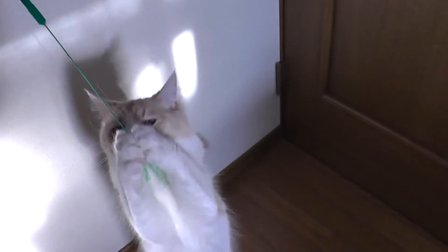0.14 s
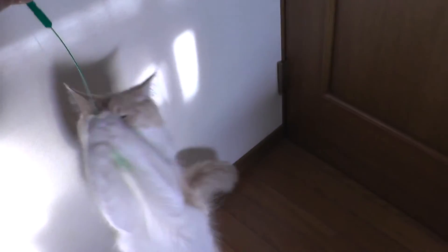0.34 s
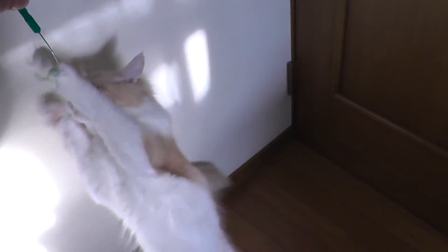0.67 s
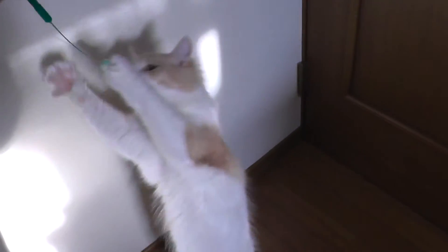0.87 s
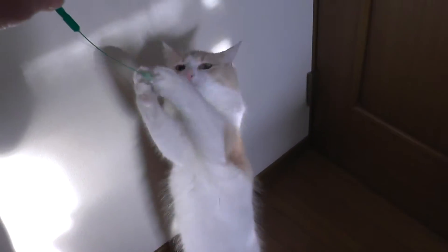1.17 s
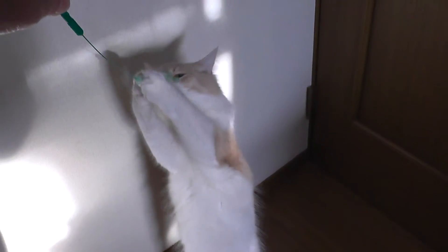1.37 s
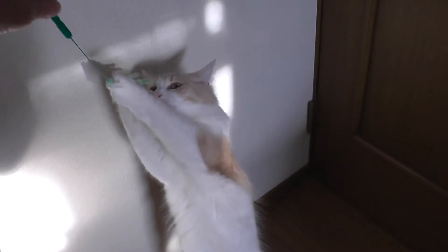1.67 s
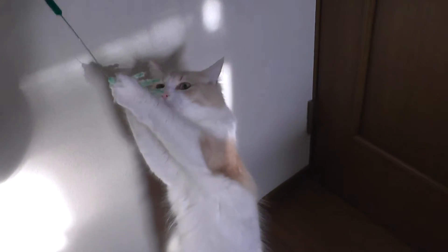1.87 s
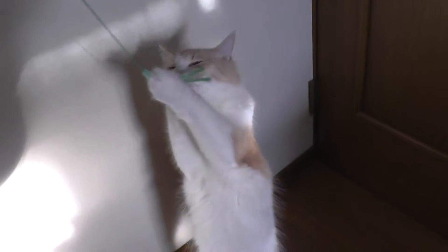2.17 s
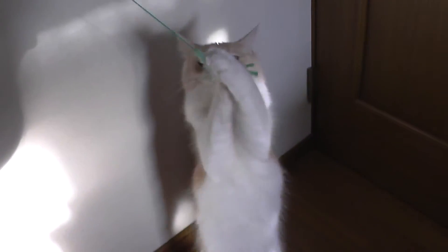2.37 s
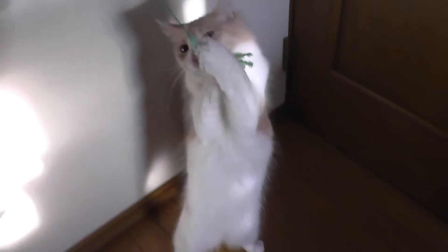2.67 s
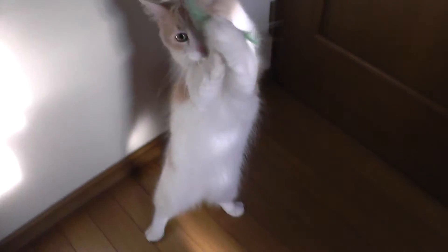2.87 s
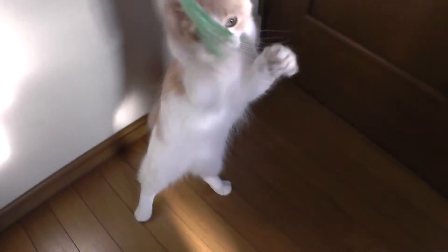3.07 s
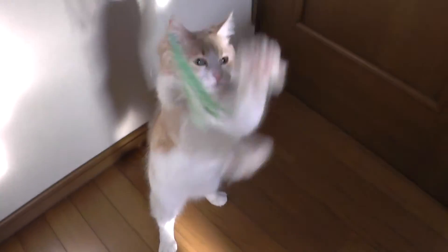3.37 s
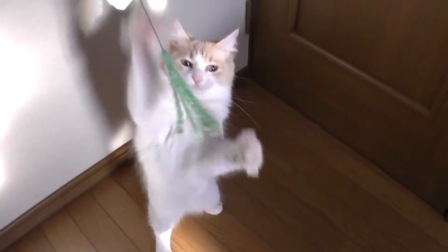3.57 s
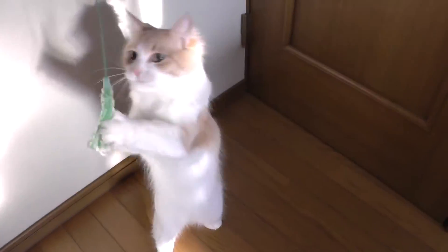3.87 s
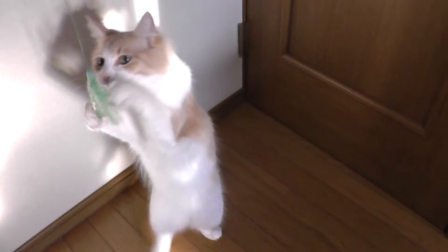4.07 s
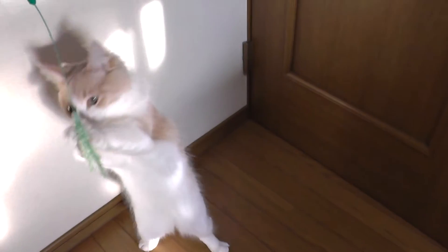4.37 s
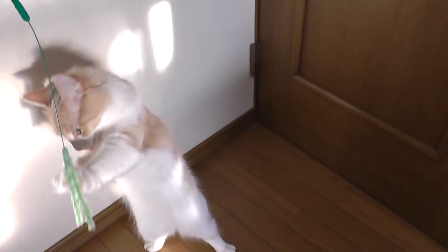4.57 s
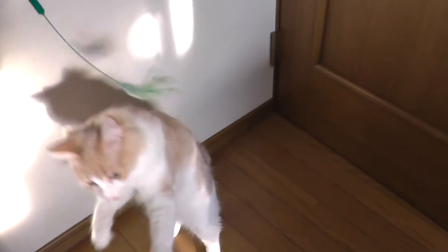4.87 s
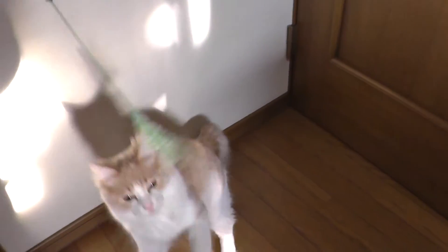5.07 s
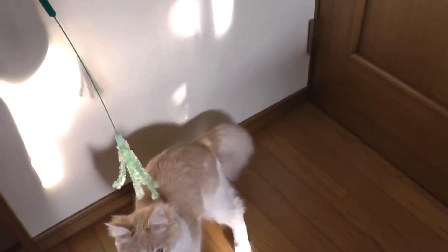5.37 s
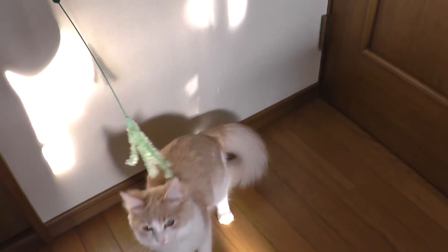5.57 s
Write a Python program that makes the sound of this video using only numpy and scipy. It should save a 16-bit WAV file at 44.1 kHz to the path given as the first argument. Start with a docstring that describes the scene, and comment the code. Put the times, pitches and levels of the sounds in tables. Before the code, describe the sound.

A cat plays with a strand toy in a small hallway, heard on a handheld stereo microphone with low wavering room tone and constant soft hiss. A dry swish starts at once, with a woody paw thud at 0.06 s. Faint, fast motor ticking over a thin whine runs until about 1 s, barely pausing near 0.75. Small snaps come near 0.5, a softer thud at 0.8, then gentle rustling, with a tiny hollow pop and snaps around 1.8. Near 2.35 a clearer pop meets a very faint rising squeak, then a thud at 2.44. A heavier thump lands at 3.2; snaps, a swish and a low knock cluster at 3.6-3.8. Motor ticking returns at 4.1-4.85, with a strong double thud at 4.24 and a sharp snap at 4.8. Thuds and bright clicks crowd 5.1-5.25, a falling pad rub follows at 5.5, and a weak thump and rustle at 5.7.

```python
"""A cat on its hind legs swipes at a grass toy in a small hallway. A swish of friction noise opens it; a camera's
focus motor ticks as a ringing housing over a thin whine, early on and again near 4 s. Paws thud on wooden boards,
which ring as many fading notes. Strands and claws snap as tiny noise bursts; two short hollow pops and, last, a
low knock are pairs of fading notes; one faint squeak slides near 2.3 s. Thuds and snaps crowd together from 3.6 s;
near 5.5 s a pad rubs the boards as falling noise. Room tone and microphone hiss, both shaped noise, never stop."""
import sys
import numpy as np
from scipy import signal
from scipy.fft import rfft, irfft, next_fast_len
from scipy.io import wavfile
from scipy.ndimage import map_coordinates

SR = 44100
rng = np.random.default_rng(int(sys.argv[2]) if len(sys.argv) > 2 else 0)


def digitize_waveform(pressure):
    """Quantize a signal to 16-bit integers and store it at the path in sys.argv[1].

    Rows of a 2-D input are taken as channels; values are limited to [-1, 1].
    """
    field = np.atleast_2d(pressure).T
    bounded = np.clip(field, -1, 1)
    quanta = np.round(bounded * 32767).astype(np.int16)
    wavfile.write(sys.argv[1], SR, quanta)


N = 252693  # length in samples

# paw landings: (t/s, boom level at 110 Hz/dB, body level at 160 Hz/dB, knock level at 310 Hz/dB,
# slap level at 600 Hz/dB, push level/dB, push f/Hz)
PAW_LANDINGS = [(0.058, -32.5, -32, -31, -36, -39, 151), (0.286, -47.5, -59.5, -78, -68, -66, 132),
                (0.832, -37, -39, -55.5, -54.5, -58, 146), (2.4428, -37.5, -38.5, -42, -44, -33.5, 184),
                (3.2296, -26.5, -38.5, -31.5, -37, -36, 135), (3.608, -72, -66, -62, -52, -60, 300),
                (3.648, -72, -59, -65, -47, -49, 234), (3.784, -76, -73, -57.5, -55, -65, 299),
                (4.147, -73, -54, -60.5, -45.5, -64, 159), (4.238, -28.5, -62, -33, -33, -41, 470),
                (4.257, -33.5, -38.5, -43.5, -44.5, -44, 136), (4.864, -46.5, -40.5, -49, -58, -47, 155),
                (4.885, -48, -52, -51, -50.5, -47, 328), (5.119, -63, -63, -74, -40, -64, 466),
                (5.170, -43, -40, -48, -38.5, -47, 154), (5.216, -39, -56, -42, -53, -56, 234),
                (5.237, -41, -60, -48.5, -42.5, -52, 306), (5.705, -62, -57, -63, -51, -62, 200)]
# where the spot on the boards sets the level: (f/Hz)
SPOT_HZ = [110, 160, 225, 310, 600]
# notes of the floorboards, before small random shifts: (f/Hz, level/dB, t60 before the ring factor/s, build-up/s)
BOARD_MODES = [(115, 0.5, 0.18, 0.0037), (159.7, 4, 0.13, 0.0035), (235.7, 2.5, 0.15, 0.0026),
               (236.1, -0.5, 0.16, 0.002), (285.4, 0.5, 0.16, 0.0058), (307.5, -3, 0.18, 0.01),
               (332.2, -6, 0.24, 0.012), (347, 0.5, 0.21, 0.017), (393, 0, 0.077, 0.0028),
               (422.6, -5.5, 0.21, 0.015), (462.7, -8.5, 0.2, 0.0073), (525, -7.5, 0.12, 0.0017),
               (608, -10.5, 0.088, 0.0081)]
DRUM_DB = -2.5  # level at 225 Hz over the mean of body and knock
RING_SOFT, SOFT_HZ, RING_SHORTENS = 1.296, 147, 0.33  # ring factor at a 147 Hz push; quicker pushes ring shorter


def board_ring(t, spot, ringing):
    """The boards ring as many fading notes; the spot sets how strongly each one speaks."""
    ring = np.zeros(len(t))
    for k, (hz, mode_db, t60, rise) in enumerate(BOARD_MODES):
        level_db = mode_db + along(spot, hz) + rng.normal(0, 1.5)
        fade = amp(level_db - 60 * t / (t60 * ringing))
        # each note's pitch shifts slightly at random on every landing
        note = np.sin(2 * np.pi * hz * rng.normal(1, 0.013) * t)
        # the weight settles, so each note swells before it fades
        swell = 1 - np.exp(-t / rise)
        ring += (-1) ** k * fade * note * swell
    return ring


def paws():
    """A soft pad pushes the boards, slaps them and leaves them ringing, answered by the hall."""
    out, t = np.zeros((2, N)), np.arange(SR // 3) / SR
    for s, boom_db, body_db, knock_db, slap_db, push_db, push_hz in PAW_LANDINGS:
        drum_db = (body_db + knock_db) / 2 + DRUM_DB
        spot = list(zip(SPOT_HZ, [boom_db, body_db, drum_db, knock_db, slap_db]))
        ringing = RING_SOFT * (SOFT_HZ / push_hz) ** RING_SHORTENS
        ring = board_ring(t, spot, ringing)
        push = np.sin(2 * np.pi * push_hz * t) * np.exp(-((push_hz * t - 1.1) / .75) ** 2)
        # above the modes the boards answer with a dense noise
        dense = unit(filtered(rng.standard_normal(len(t)), lambda f: resonance(f, 647, 470) ** 2))
        slap = dense * amp(slap_db - 11 - 60 * t / (0.15 * ringing))
        # weaken everything below about 65 Hz
        thud = filtered(ring - amp(push_db) * push + slap, lambda f: (1j * f / (65 + 1j * f)) ** 2)
        add(out, s, thud[None])
        add(out, s, amp(-9.5) * hall(thud[:SR // 10]))
    return out


# claws tick and pads scuff: (t/s, low band level/dB, middle band level over low/dB, left over right level/dB)
PAW_SCUFFS = [(0.0596, -67.5, -1.5, -2), (2.4438, -79, 2, -1.5), (3.2308, -67, -2, 4),
              (3.609, -77.5, -24, 1), (3.7824, -74.5, -16, -0.5), (4.1474, -68, -23, -0.5),
              (4.239, -64.5, 3.5, 1.5), (5.1212, -63.5, -4, 2), (5.1721, -73.5, 0, -1),
              (5.2166, -57.5, 3, 3), (5.6802, -68.5, -17, -0.5)]
SCUFF_HIGH_DB = -11  # high band over the middle


def scuff_bands(low_db, middle_db):
    """High, middle and low band level of a scuff."""
    return np.array([low_db + middle_db + SCUFF_HIGH_DB, low_db + middle_db, low_db])


# snaps of the toy's strands: (t/s, high band level/dB, middle band level over high/dB, left over right level/dB)
STRAND_SNAPS = [(0.4544, -56, -16, 6), (0.4977, -53, -22, 0.5), (1.8345, -60, -3, 0.5),
                (1.8638, -49, -4, -1), (1.882, -54, 6, -7), (2.372, -60, -15, 0), (2.9145, -54, 2.5, 0),
                (3.6497, -55, -3, -1), (3.684, -41.5, -2.5, 0), (3.696, -60, 12, -1),
                (3.7304, -60, -11, -0.5), (4.8111, -41, -3.5, 2), (5.2198, -44, 11, 3),
                (5.2304, -39.5, -3, 0.5), (5.4895, -64, -3, -2), (5.5907, -64, -16, 1.5)]
# high, middle and low band, where strands, fur and pads sound: (f/Hz, width/Hz)
FRICTION_BANDS = [(9960, 4700), (5620, 3200), (1920, 2860)]
# claw tick over its scuff in the high, middle and low band: (level/dB)
CLAW_OVER_SCUFF_DB = [21.5, 17.5, 19.5]
SNAP_LOW_DB, SNAP_T60 = -1.5, 0.01  # low band over the high (dB); fade of the noise before the bands (s)


def snaps():
    """Each snap of a strand or tick of a claw is a brief burst of noise in three bands, answered by the hall."""
    out, t = np.zeros((2, N)), np.arange(SR // 12) / SR
    bursts = []
    for s, db, middle_db, pan_db in STRAND_SNAPS:
        bursts.append((s, [db, db + middle_db, db + SNAP_LOW_DB], pan_db))
    for s, db, middle_db, pan_db in PAW_SCUFFS:
        bursts.append((s, scuff_bands(db, middle_db) + CLAW_OVER_SCUFF_DB, pan_db))
    for s, band_db, pan_db in bursts:
        noise = rng.standard_normal(len(t)) * amp(-60 * t / SNAP_T60) * (1 - np.exp(-t / .0005))
        noise[20] += 2.5  # the sharp edge of the break
        parts = [filtered(noise, lambda f: resonance(f, hz, w) ** 2) for hz, w in FRICTION_BANDS]
        # each band is set to its own peak level
        snap = sum(amp(db) * part / np.abs(part).max() for db, part in zip(band_db, parts))
        add(out, s, snap * amp([[pan_db / 2], [-pan_db / 2]]))
        add(out, s, amp(-25.0) * hall(snap))
    return out


# swishes of toy and fur: (t/s, rise/s, hold/s, high band level/dB)
TOY_SWISHES = [(0, 0.0022, 0.026, -66), (0.44, .012, 0.061, -72.5), (.744, .045, .08, -77.5),
               (1.067, .079, .15, -85), (1.498, .017, .079, -82.5), (1.831, .004, 0.031, -70),
               (2.345, .009, 0.038, -83), (2.91, .002, .007, -79), (2.982, .058, .031, -74.5),
               (3.1, .02, .04, -76), (3.349, 0.023, 0.015, -76.5), (3.652, .0044, 0.033, -63),
               (3.726, .003, .013, -73.5), (4.043, 0.053, 0.022, -75.5), (4.811, .001, 0.011, -65),
               (5.31, .1, .086, -72.5), (5.688, .025, .05, -70.5)]
SWISH_MIDDLE_DB, SWISH_LOW_DB = -2, -6.5  # over the high band
SWISH_T60, USUAL_DB, LINGER = 0.18, -70.5, .6  # fade (s) at the usual level; gentler swishes linger
SCUFF_RISE_S, SCUFF_HOLD_S, SCUFF_T60 = 0.00086, 0.011, 0.29


def rustle():
    """Grainy strokes of friction: thin strands highest, fur in the middle, pads scuffing the boards lowest."""
    t, powers = np.arange(SR) / SR, np.zeros((len(FRICTION_BANDS), N))
    strokes = []
    for s, rise, hold, db in TOY_SWISHES:
        t60 = SWISH_T60 * amp(LINGER * (USUAL_DB - db))
        strokes.append((s, rise, hold, t60, [db, db + SWISH_MIDDLE_DB, db + SWISH_LOW_DB]))
    for s, db, middle_db, _ in PAW_SCUFFS:
        strokes.append((s, SCUFF_RISE_S, SCUFF_HOLD_S, SCUFF_T60, scuff_bands(db, middle_db)))
    for s, rise, hold, t60, band_db in strokes:
        fade = amp(-60 * np.clip(t - rise - hold, 0, None) / t60)
        stroke = np.clip(t / rise, 0, 1) * fade
        add(powers, s, (amp(band_db)[:, None] * stroke) ** 2)  # overlapping strokes add as power
    out = np.zeros((2, N))
    # left-right likeness (0-1) and grain (dB) of each band
    for power, (hz, w), like, grain_db in zip(powers, FRICTION_BANDS, [.3, .7, .75], [2.2, 1.6, 1.8]):
        noise = rush(lambda f: abs(resonance(f, hz, w)) ** 2, [(hz, like)], grain_db)
        out += np.sqrt(power) * noise
    return out


# short hollow pops and, last, a low knock:
# (t/s, low note level/dB, low f/Hz, high f/Hz, high note level over low/dB)
POPS_AND_KNOCK = [(1.7894, -53, 805, 943, 12), (2.333, -39.5, 633, 1103, -1), (3.6816, -42.5, 195, 537, 6)]


def pops_and_knock():
    """Two fast-dying notes each, answered by the hall."""
    out, t = np.zeros((2, N)), np.arange(SR // 20) / SR
    for s, db, low_hz, high_hz, high_db in POPS_AND_KNOCK:
        notes = np.sin(2 * np.pi * low_hz * t) + amp(high_db) * np.sin(2 * np.pi * high_hz * t)
        pair = notes * amp(db - 60 * t / 0.026) * (1 - np.exp(-t / 0.00063))
        add(out, s, pair[None])
        add(out, s, amp(-11.5) * hall(pair))
    return out


# one rising squeak: (start t/s, length/s, first f/Hz, last f/Hz)
SQUEAK_GLIDE = (2.35, .045, 595, 640)
SQUEAK_DB = -59.5


def squeak():
    """A faint, short sliding tone with its octave."""
    phase, swell = glide(*SQUEAK_GLIDE)
    return amp(SQUEAK_DB) * swell * (np.sin(phase) + amp(-7) * np.sin(2 * phase))


# a pad dragged on the boards: (start t/s, length/s, first f/Hz, last f/Hz)
RUB_GLIDE = (5.47, .095, 1380, 1040)
RUB_DB, RUB_HISS_DB = -60.5, -68


def rub():
    """The dragged pad makes a narrow, falling band of noise inside a broader hiss."""
    phase, swell = glide(*RUB_GLIDE)
    hiss = unit(filtered(rng.standard_normal(N), lambda f: resonance(f, *FRICTION_BANDS[-1]) ** 2))
    # a quick random level roughens the tone into a narrow band
    tone = wobble(220) * np.sin(phase)
    return amp(RUB_DB) * swell * tone + amp(RUB_HISS_DB) * np.sqrt(swell) * hiss


# focus motor runs; levels before the left-right split:
# (first tick t/s, end t/s, strong tick level/dB, whine level/dB)
MOTOR_RUNS = [(.0297, .74, -61, -76), (.7676, 1.01, -59.5, -76), (4.0671, 4.44, -61.5, -81),
              (4.5342, 4.85, -62, -81)]
# the housing rings at each tick, with small random shifts: (f/Hz, level/dB, t60/s)
HOUSING_MODES = [(1350, -2, .008), (1750, -1, .007), (2650, -5, .008), (3300, -10, .005),
                 (3800, -1.5, .009), (5500, -9, .005), (6800, -10, .005)]
TICK_RATE = 59.94  # ticks a second
WEAK_DB = -8  # every second tick
CLICK_DB, CLICK_T60 = 1, .006  # dry broad click in each tick; its fade (s)


def focus_motor():
    """Steady ticks, strong and weak in turn, ring the housing over a thin whine."""
    out, whine, t = np.zeros(N), np.zeros(N), np.arange(SR // 50) / SR
    scatter_db, detune, rise = 1.3, .012, .0013
    hz, mode_db, t60 = np.transpose(HOUSING_MODES)[:, :, None]
    # each mode swells for a moment, then dies
    swell = np.where(t < rise, t / rise, amp(-60 * (t - rise) / t60))
    for start, end, strong_db, whine_db in MOTOR_RUNS:
        for k, s in enumerate(np.arange(start, end, 1 / TICK_RATE)):
            size, pitch = rng.standard_normal((2, len(hz), 1))
            notes = np.sin(2 * np.pi * hz * (1 + detune * pitch) * t)
            modes = amp(mode_db + scatter_db * size) * swell * notes
            noise = filtered(rng.standard_normal(len(t)), lambda f: resonance(f, 2600, 3500))
            click = amp(CLICK_DB - 60 * t / CLICK_T60) * noise
            add(out, s, amp(strong_db + WEAK_DB * (k % 2)) * (modes.sum(0) + click))
        whine[round(start * SR):round(end * SR)] = amp(whine_db)
    out += whine * unit(filtered(rng.standard_normal(N), lambda f: resonance(f, 1296, 50)))
    return out * amp([[2], [-2]])  # the motor sits nearer the left port


# slow swells of the low room tone: (t/s, level/dB)
ROOM_LEVEL = [(0.0, -60.5), (0.35, -64), (1.42, -65.5), (1.68, -60), (2.09, -65.5), (2.51, -63.5),
              (2.84, -64.5), (3.62, -65.5), (3.8, -61), (3.96, -63), (4.72, -62), (5.73, -63.5)]
# colour of the room tone: (f/Hz, relative level per Hz/dB)
ROOM_COLOUR = [(15, -51), (25, -14), (86, -4), (186, -10), (232, -1.5), (266, -10.5), (300, -2),
               (327, -7.5), (422, -8), (484, -10.5), (897, -15), (1500, -22.5), (1950, -57), (3300, -120)]
# how alike left and right are in the room tone: (f/Hz, likeness up to 1)
ROOM_LIKENESS = [(30, 1), (80, 0.97), (250, 0.92), (640, 0.75), (1400, 0.84)]
# colour of the microphone hiss: (f/Hz, relative level per Hz/dB)
HISS_COLOUR = [(590, -24.5), (1000, -1), (1140, -16), (1480, -15.5), (1690, -0.5), (2080, -11.5),
               (4360, -17.5), (5830, -12.5), (7790, -16.5), (9380, -16), (16000, -18)]
# how alike left and right are in the hiss: (f/Hz, likeness up to 1)
HISS_LIKENESS = [(1400, 0.86), (3100, 1), (4500, 0.94), (6800, 0.13), (15000, 0.066)]
WAVER_DB = 1.5  # quick wavering of the room tone


def background():
    """Low room tone that swells slowly and wavers quickly, and steady microphone hiss: both are shaped noise."""
    room_db, = curves(ROOM_LEVEL)
    room = rush(lambda f: amp(along(ROOM_COLOUR, f)), ROOM_LIKENESS)
    hiss = rush(lambda f: amp(along(HISS_COLOUR, f)), HISS_LIKENESS)
    return amp(room_db + WAVER_DB * wobble(12)) * room + amp(-71.5) * hiss


# how long the hallway echoes: (f/Hz, t60/s)
HALL_FADE = [(150, 0.1), (1000, 0.5), (5500, 0.1), (12000, 0.81)]


def hall(x):
    """A fresh diffuse tail on a short sound; the two sides differ only above the bass."""
    hz, t, z = signal.stft(rng.standard_normal((2, SR // 3)), SR, nperseg=256)
    z = z * amp(-60 * t / along(HALL_FADE, hz)[:, None])
    z[1] *= (hz / (hz + 500))[:, None]  # little side signal in the bass
    mid, side = signal.istft(z, SR, nperseg=256)[1]
    tail = np.array([mid + side, mid - side]) / np.linalg.norm(mid)
    late = np.pad(x, (130, 0))  # the tail starts 130 samples (3 ms) late
    return signal.fftconvolve(late[None], tail, axes=1)


def amp(db):
    """dB to gain."""
    return 10 ** (np.asarray(db) / 20)


def unit(x):
    """x at rms 1."""
    return x / np.sqrt(np.mean(x ** 2) + 1e-20)


def along(points, hz):
    """Read a curve of (f/Hz, value) points on a log frequency axis."""
    f, v = np.transpose(points)
    return np.interp(np.log(hz + 1), np.log(f + 1), v)


def curves(rows):
    """One value per sample for each column after the time."""
    s, *cols = np.transpose(rows)
    return [np.interp(np.arange(N) / SR, s, c) for c in cols]


def wobble(rate):
    """A smooth random curve through rate random points a second."""
    knots = rng.standard_normal(int(N * rate / SR) + 4)
    return map_coordinates(knots, [np.arange(N) * rate / SR])


def filtered(x, response):
    """Shape x by a complex response of frequency."""
    m = next_fast_len(x.shape[-1] + 8192)
    return irfft(rfft(x, m) * response(np.fft.rfftfreq(m, 1 / SR)), m)[..., :x.shape[-1]]


def resonance(f, hz, width_hz):
    """One causal resonance with top gain 1."""
    return 1j * f * width_hz / (hz * hz - f * f + 1j * f * width_hz)


def rush(gain, alike, grain_db=0):
    """Stereo noise of rms 1; a fast random gain makes it grainy."""
    pair = rng.standard_normal((2, N)) * amp(grain_db * wobble(300))

    def mid_side(hz):
        # the less alike the two sides, the more side signal
        turn = np.arccos(np.clip(along(alike, hz), -1, 1)) / 2
        return gain(hz) * [np.cos(turn), np.sin(turn)]

    mid, side = filtered(pair, mid_side)
    return unit(np.array([mid + side, mid - side]))


def glide(start, length, first_hz, last_hz):
    """Phase and smooth swell of one sliding tone."""
    u = np.clip((np.arange(N) / SR - start) / length, 0, 1)
    hz = first_hz * (last_hz / first_hz) ** u
    return 2 * np.pi * np.cumsum(hz) / SR, np.sin(np.pi * u) ** 2


def add(track, s, sound):
    """Mix a sound into a track from time s."""
    part = track[..., round(s * SR):][..., :sound.shape[-1]]
    part += sound[..., :part.shape[-1]]


def scene():
    """Everything that reaches the two microphones."""
    touches = paws() + snaps() + rustle() + pops_and_knock() + squeak() + rub()
    return touches + focus_motor() + background()


# narrow bands weakened by the microphone ports: (f/Hz, width/Hz, depth 0-1)
PORT_NOTCHES = [(4460, 390, 0.49), (7740, 590, 1)]
TOP_HZ = 15810  # nothing passes above


def record(dry):
    """The ports cancel two narrow bands; the right side is brighter; the top is cut."""
    def response(f):
        notches = 1
        for hz, w, depth in PORT_NOTCHES:
            notches = notches * (1 - np.clip(depth, 0, 1) * resonance(f, hz, w))
        side_db = along([(9000, 0.043), (12000, 0.77)], f) * [[-1], [1]]  # left down, right up
        both_db = along([(12000, 0.97), (15500, -1.1)], f)
        return notches * amp(side_db + both_db) * (f < TOP_HZ)

    return filtered(dry, response)


dry = scene()
out = record(dry)
digitize_waveform(out)
```